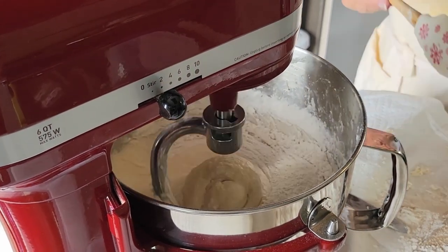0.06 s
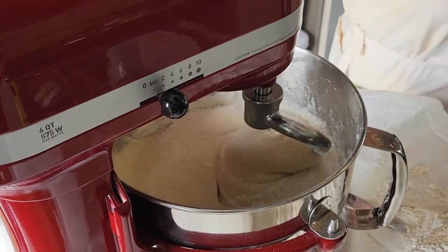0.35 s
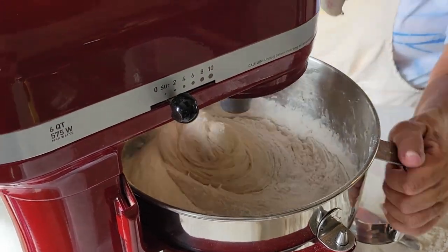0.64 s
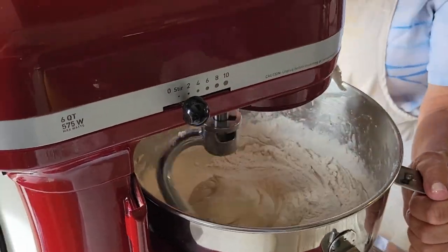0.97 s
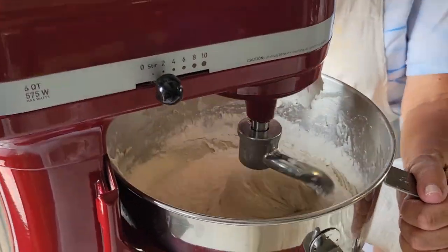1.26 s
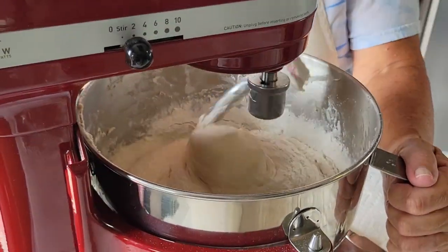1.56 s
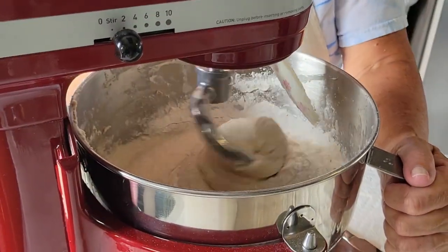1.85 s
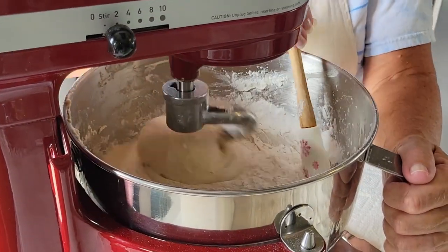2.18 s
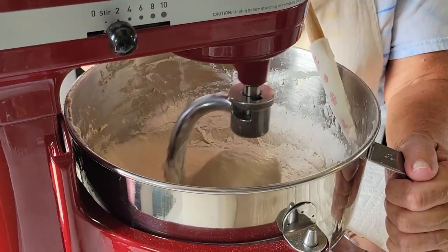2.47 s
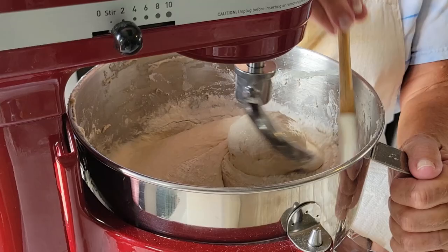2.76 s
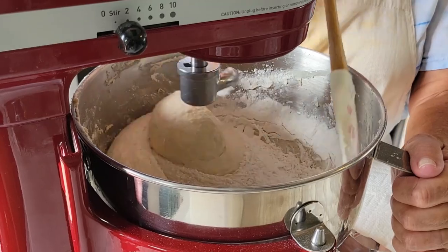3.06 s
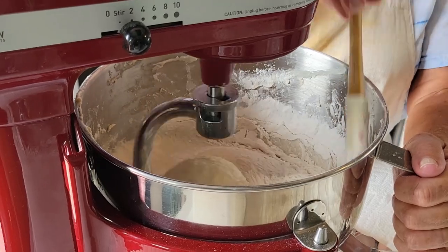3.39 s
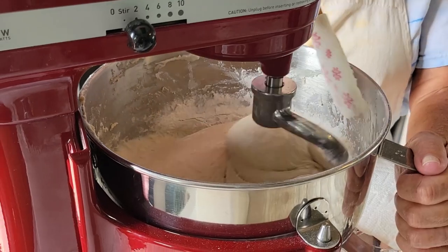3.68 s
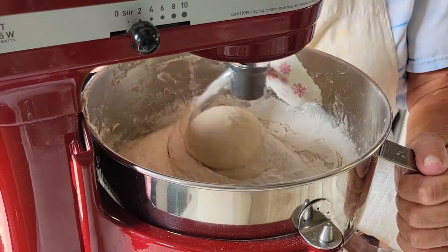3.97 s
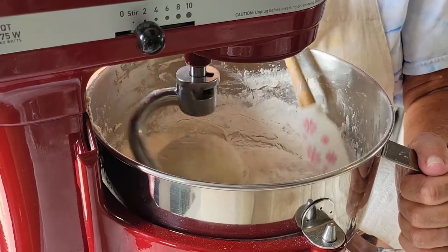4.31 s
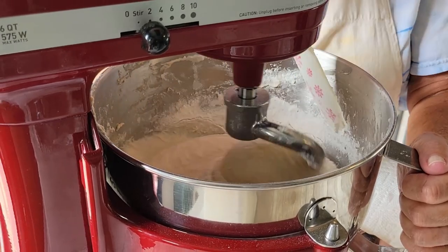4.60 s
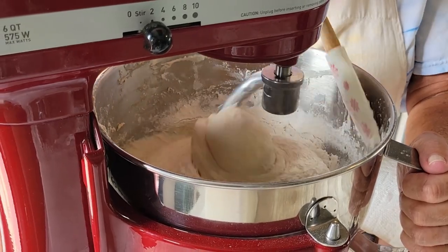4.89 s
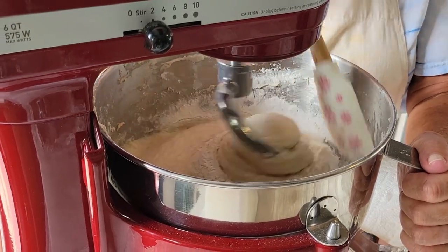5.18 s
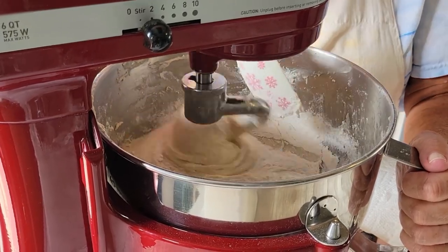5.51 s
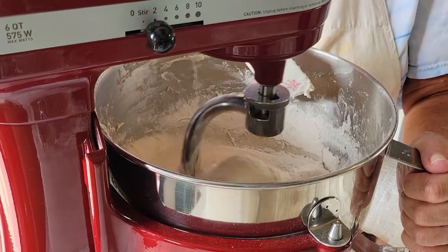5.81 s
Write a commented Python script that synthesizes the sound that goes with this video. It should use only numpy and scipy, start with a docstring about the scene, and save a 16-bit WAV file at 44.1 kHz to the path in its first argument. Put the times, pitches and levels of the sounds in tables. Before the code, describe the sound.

Heard up close in a kitchen, first beside the motor and then above the bowl, an electric stand mixer works dough throughout. The motor hums and hisses while the gears chatter and whine, sagging slightly in pitch with each stroke of the hook. Thin, brief squeaks rise out of the running noise. From about two seconds in, the dough now and then thuds softly against the metal bowl, with a few light ticks.

```python
"""A stand mixer kneads bread dough, heard from beside its motor head and then over the bowl. Its gear whine
sags each time the hook drags through the dough, about three times a second. Knocking teeth ring the bowl, the
brushes hiss, the motor hums and its cooling fan rushes. Brief squeaks swell out of the running noise; now and
then the bowl gives a soft thump or a tick."""
import sys
import numpy as np
from scipy import signal
from scipy.fft import rfft, irfft
from scipy.io import wavfile

SR = 44100
rng = np.random.default_rng(int(sys.argv[2]) if len(sys.argv) > 2 else 0)


def output_pcm(signal):
    """Save a mono or channel-first signal as 16-bit PCM at the path in sys.argv[1].

    Samples are clipped to [-1, 1] before scaling.
    """
    pcm = np.clip(np.atleast_2d(signal).T, -1, 1) * 32767
    wavfile.write(sys.argv[1], SR, np.round(pcm).astype(np.int16))


N = 257984
TIME, FREQS = np.arange(N) / SR, np.fft.rfftfreq(N, 1 / SR)


def amp(db):
    """Decibels to gain."""
    return 10 ** (np.asarray(db) / 20)


def unit(x):
    """Scales to rms 1."""
    return x / np.sqrt(np.mean(abs(x) ** 2) + 1e-20)


def envelope(points):
    """A (time_s, value) curve at every sample."""
    return np.interp(TIME, *np.transpose(points))


def spectrum(points):
    """A (freq_hz, value) curve at every frequency."""
    hz, value = np.transpose(points)
    return np.interp(np.log(FREQS + 1), np.log(hz + 1), value)


def wander(rate_hz):
    """Smooth random modulation of rms 1, rolled off above the given rate."""
    t = TIME[::64]
    hz = np.fft.rfftfreq(len(t), t[1])
    slow = rfft(rng.standard_normal(len(t))) / (1 + (hz / rate_hz) ** 4)
    return np.interp(TIME, t, unit(irfft(slow, len(t))))


def pan(pan_db, lead_rad):
    """Complex stereo gains: positive values make the left side louder and earlier."""
    side = np.array([[.5], [-.5]])
    return amp(side * pan_db) * np.exp(1j * side * lead_rad)


def add(mix, start_s, sound):
    """Mixes a sound in at a time."""
    part = mix[..., round(start_s * SR):][..., :sound.shape[-1]]
    part += sound[..., :part.shape[-1]]


def resonate(x, hz, width_hz):
    """Complex response of a mode with steep skirts; its pitch may move."""
    carrier = np.exp(2j * np.pi * np.cumsum(hz * np.ones(x.shape[-1])) / SR)
    pole = np.exp(-2 * np.pi * width_hz / SR)
    return carrier * signal.lfilter([1], [1, -2 * pole, pole * pole], x * carrier.conj())


# Listening spot: time_s, position (0 beside the motor head, 1 over the bowl)
LISTENER_PATH = [(0, 0.039), (.7, 0.13), (1.05, 0.62), (1.25, 0.7), (1.55, 1), (5.85, 0.88)]

def beside_head():
    """Nearness to the motor head, 0 to 1; scales every beside_db."""
    return 1 - envelope(LISTENER_PATH)


# Hook strokes: free_s, spurt_hz (rise in tooth rate), mesh_db (tooth tone boost in the next drag)
HOOK_STROKES = [(0.181, 13.7, -14), (0.512, 13.45, -5), (0.846, 9.4, -5.5), (1.17, 12, -4.5),
                (1.504, 10, 0.5), (1.855, 16.9, -0.5), (2.183, 14, -0.5), (2.503, 13.4, -0.5),
                (2.837, 15, 0), (3.196, 15.4, 1), (3.524, 14, -3), (3.856, 15, 0), (4.193, 13.77, 0.5),
                (4.523, 15.6, -2.5), (4.871, 12.4, 0), (5.192, 13, -0.5), (5.51, 14.7, -2), (5.85, 8.9, 6)]

def tooth_rate(loaded_hz=513.3, swing_s=.045):
    """Meshing rate in Hz: low while the hook drags, with a spurt each time it slips free."""
    t = TIME[::64]
    spurts = sum(hz * np.exp(-.5 * ((t - free_s) / swing_s) ** 2) for free_s, hz, _ in HOOK_STROKES)
    return loaded_hz + np.interp(TIME, t, spurts)


def mesh_boost(drag_after_s=.13):
    """The tooth tone, in dB, swells with the dough that each stroke catches."""
    free_s, _, mesh_db = np.transpose(HOOK_STROKES)
    return np.interp(TIME, free_s + drag_after_s, mesh_db)


def load():
    """How hard the hook drags: the sag of the speed, mean 0 and rms 1; scales every load_db."""
    tooth_hz = tooth_rate()
    return unit(tooth_hz.mean() - tooth_hz)


TEETH = 30
# Gear partials: shaft_harmonic (rounded when played), level_db, pan_db, lead_rad, load_db
WHINE_PARTIALS = [(26, -43.5, -1, 1.5, 0.5), (28, -52, -1, 0.5, 9), (30, -30.5, -3, 1.22, 1.33),
                  (31, -45, -12, -0.1, -2), (36, -46, -2, 2, 4.5), (39, -55.5, 4, 1.4, 8),
                  (60, -47.5, 1, 1.5, 5.5), (62, -49, -6, 2, -4.5), (70.1, -49, 0, 1, 4),
                  (72.5, -39.5, -0.5, 3.5, -0.5), (83.5, -48, 9, 2, 3.5), (87.2, -39.5, 7, 2.5, -0.5),
                  (89.7, -38, 9, 2.2, -2.5), (92, -38, -3.5, 1.5, 1.5), (121.3, -46.5, 5, 2, 2),
                  (124.4, -49.5, 5, 1.5, 0)]

def gear_whine(turns, shimmer_db=1.4):
    """Meshing teeth sing at multiples of the shaft rate; play in the gears makes each tone flutter."""
    out = np.zeros((2, N))
    backlash = (.3 * wander(12) + .15 * wander(40)) / TEETH
    shaft_rad = 2 * np.pi * turns + backlash
    mesh_db, drag = mesh_boost(), load()
    for harmonic, db, pan_db, lead_rad, load_db in WHINE_PARTIALS:
        harmonic = round(harmonic)
        tone = np.exp(1j * harmonic * shaft_rad + 2j * np.pi * rng.random())
        level_db = db + shimmer_db * wander(14) + load_db * drag + mesh_db * (harmonic == TEETH)
        out += amp(level_db) * unit((pan(pan_db, lead_rad) * tone).real)
    return out


def ring(modes, impacts, bend, diffuse, waver_db, waver_hz):
    """Impacts ring each mode unevenly, its pitch scaled by bend; diffuse widens the stereo image."""
    out, beside, drag = np.zeros((2, N)), beside_head(), load()
    pair = impacts[0] + diffuse * np.array([[1], [-1]]) * impacts[1]
    for hz, width_hz, db, pan_db, lead_rad, beside_db, load_db in modes:
        rung = pan(pan_db, lead_rad) * resonate(pair, hz * bend, width_hz)
        flutter_db = waver_db * wander(waver_hz) / (1 + (width_hz / 300) ** 2)  # wide modes waver less
        out += amp(db + beside_db * beside + load_db * drag + flutter_db) * unit(rung.real)
    return out


# Bowl resonances: pitch_hz, width_hz, level_db, pan_db, lead_rad, beside_db, load_db
BOWL_MODES = [(445.6, 32, -38.5, -5, 0.31, -2, -0.5), (529.7, 17, -42, -4.5, 0.74, -0.5, -3),
              (1019.7, 11.3, -46.5, -16, 0.73, 7, 2), (1780, 106, -42, 3.5, 3.55, -0.5, 1),
              (2046, 20, -43.5, 4, 0.2, -8, 0)]
# Tooth chatter that bends with the speed: same columns
CHATTER_BANDS = [(1295, 58, -38.5, -3.5, 3.17, 6.5, -0.81), (1556, 56, -35, 1.5, 1.62, 2.5, -0.22),
                 (2108, 65, -46.5, 5, 0.22, -5, -1.3), (2476, 75, -38.5, 5, 2.63, -6, -0.37),
                 (2594, 54, -40.5, -15, 1.4, -5.5, 0.037)]

def gear_rattle(turns, throb=.04, wear=.42):
    """Teeth knock as they engage, partly by chance, partly in a pattern that turns with the shaft."""
    flaws = rng.standard_normal(2560)
    repeating = flaws[(turns % 1 * len(flaws)).astype(int)] * np.array([[1], [0]])  # centre only
    force = 1 + throb * np.cos(2 * np.pi * turns)
    knocks, chatter = force * (rng.standard_normal((2, 2, N)) + wear * repeating)
    tooth_hz = tooth_rate()
    bend = tooth_hz / tooth_hz.mean()
    bowl_ring = ring(BOWL_MODES, knocks, bend=1, diffuse=.61, waver_db=1.24, waver_hz=12)
    return bowl_ring + ring(CHATTER_BANDS, chatter, bend, diffuse=.46, waver_db=2.03, waver_hz=10)


def reflect(x, wet, t60_s, patterns=5):
    """Echoes off bowl and counter comb the sound; the pattern drifts as the listener moves."""
    t = TIME[:SR // 20]
    progress = np.sqrt(TIME / TIME[-1]) * (patterns - 1)
    out = x.copy()
    for k in range(patterns):
        arrives = (rng.random((2, len(t))) < .1) & (t > .004)
        taps = rng.standard_normal((2, len(t))) * arrives * amp(-60 * t / t60_s)
        taps /= np.linalg.norm(taps, axis=1, keepdims=True)
        crossfade = np.cos(np.pi / 2 * np.clip(progress - k, -1, 1))
        out += wet * crossfade * signal.oaconvolve(x, taps, axes=1)[:, :N]
    return out / np.sqrt(1 + wet ** 2)


# Tone of the brush hiss: freq_hz, gain_db
HISS_EQ = [(1500, -30.5), (2300, -22.5), (2900, -23.5), (3600, -10.5), (4030, -14.5), (4450, -7.5),
           (5000, -2), (6500, -1), (8000, -3), (9200, -3), (10000, -13), (11400, -17), (13200, -11.5),
           (15700, -27)]
# Stereo spread of the hiss: freq_hz, pan_db
HISS_PAN = [(3000, -17), (5500, 0), (7000, 3), (9000, -1.5), (11000, 7.5), (12300, -1), (14000, 7)]
# Casing resonances: pitch_hz, width_hz, level_db, pan_db, lead_rad, beside_db, load_db
CASING_MODES = [(3211, 186, -42.5, 1.5, 4.5, 3, 0.75), (3696, 75, -42, -7, 0.96, -12, 1),
                (3834, 80, -44, 4, 1.5, 8, -0.39), (4214, 110, -38.5, -3.5, 4.5, 0.5, -0.37),
                (5100, 99, -42, 19, 0.5, -5, -0.22), (5770, 240, -34, -9, 0.4, -3, -0.33),
                (6284, 115, -31, -1.5, 0.8, -8.5, -0.21), (6680, 220, -35, 4, 1, -15, -1),
                (6930, 45, -38.5, -5, 2, -0.5, -0.8), (7020, 35, -35, 2, 1.5, -5, .5),
                (7610, 220, -36, 2, -2, -18, -0.88), (7780, 65, -40, -13, 1, 0, 1),
                (8366, 156, -31, 11, 2, -8.5, -0.63), (8760, 130, -40.5, 10, 3.5, 3, 0.83),
                (9200, 210, -37, 12, 3, -1, 0.9), (9870, 540, -41, 4, 1.5, 1, -0.56),
                (10600, 590, -38.5, 19, 4, -2, -0.44), (13200, 350, -47, 6, 4.5, 9, -0.082)]
# Level ride of the brushes: time_s, gain_db
BRUSH_FADER = [(0, 2.5), (.45, 2), (.8, 2.5), (1.3, 1.95), (2.3, 1.45), (3.3, 2.16), (4.4, 2), (5.85, 2.5)]

def brushes(turns, hiss_db=-24, flicker_db=.44, drift=.0033):
    """Brushes scrape the commutator: a bright hiss that throbs with the shaft and rings the casing."""
    rotor_turns = 6 * turns
    throb = 1 + .019 * np.cos(2 * np.pi * turns) + .033 * np.cos(2 * np.pi * rotor_turns)
    force = throb * amp(flicker_db * wander(30))
    scrape = rfft(force * rng.standard_normal((2, N)))
    hiss = irfft(scrape * amp(spectrum(HISS_EQ)) * pan(spectrum(HISS_PAN), 0), N)
    shade_db = np.outer((-2.8, -.6), beside_head())  # beside the head, the left side is shaded more
    sound = amp(hiss_db + shade_db) * unit(hiss)
    for modes in (CASING_MODES[::2], CASING_MODES[1::2]):  # neighbouring modes ring independently
        impacts = force * rng.standard_normal((2, N))
        bend = 1 + drift * wander(4.1)
        sound += ring(modes, impacts, bend, diffuse=.16, waver_db=1.9, waver_hz=16)
    return reflect(sound, wet=.4, t60_s=.05) * amp(envelope(BRUSH_FADER))


# Mains hum and frame vibration: pitch_hz, level_db
HUM_PARTIALS = [(27, -65), (60, -59), (120, -55), (160, -59.5), (240, -44), (257, -55.5), (360, -58),
                (480, -43.5)]

def motor_hum(waver_db=2.24):
    """The motor frame buzzes at mains harmonics and a few tones of its own, whatever the speed."""
    tones = sum(amp(db + waver_db * wander(3.6)) * np.exp(2j * np.pi * (hz * TIME + rng.random()))
                for hz, db in HUM_PARTIALS)
    return np.sqrt(2) * (pan(pan_db=-1, lead_rad=.41) * tones).real


# Tone of the fan and the churning gears: freq_hz, gain_db
RUSH_EQ = [(15, -28), (40, -10), (65, -6.5), (110, -6.5), (190, -13), (240, -3.5), (300, -4.5), (420, -6.5),
           (600, -2), (900, -1.5), (1350, -4), (1950, -6), (2800, -10.5), (6000, -11)]
# Left-right likeness of the rush: freq_hz, correlation
RUSH_CORRELATION = [(30, .8), (60, .92), (250, .96), (340, .45), (450, .85), (700, .5), (1100, 0)]

def fan_rush(rush_db=-30, swell_db=1.77, beside_db=-.3, load_db=-.2):
    """The cooling fan's low rush: centred in the bass, wide on top, a touch quieter under load."""
    left, stray = rfft(rng.standard_normal((2, N)))
    alike = spectrum(RUSH_CORRELATION)
    right = alike * left + np.sqrt(1 - alike ** 2) * stray
    pair = np.array([left, right]) * pan(pan_db=-.5, lead_rad=0)
    level_db = rush_db + swell_db * wander(14) + load_db * load() + beside_db * beside_head()
    return amp(level_db) * unit(irfft(pair * amp(spectrum(RUSH_EQ)), N))


# Squeaks and rings: middle_s, length_s, level_db, pitch_hz, glide_hz_per_s, width_hz, pan_db
SQUEAK_CUES = [(0.268, 0.32, -26.5, 6400, 5, 75, -11), (0.346, 0.11, -30.5, 1026, 0, 2, -9),
               (0.434, .1, -29.5, 1035, 0, 2, -4), (1.08, 0.74, -32.5, 7600, 0, 170, -7),
               (1.688, 1.1, -41, 10900, 600, 87, 3), (1.12, .4, -36, 5720, -3, 110, 2),
               (2.349, 1.4, -39, 1570, 2, 43, 8), (2.502, .25, -31, 5700, 0, 90, 0),
               (2.65, .3, -33, 6290, 0, 60, 0), (2.87, .7, -38, 442.8, -9, 2, 3),
               (4.35, 1.28, -40, 447.5, 10.5, 1.9, -2), (5.74, 0.51, -36.5, 444.2, 2, 2.7, -3)]

def squeaks():
    """Narrow rings that fade in and out, some gliding."""
    out = np.zeros((2, N))
    for middle_s, length_s, db, hz, glide, width_hz, pan_db in SQUEAK_CUES:
        t = np.arange(-length_s / 2, length_s / 2, 1 / SR)
        pitch_hz = np.pad(hz + glide * t, (SR, 0), "edge")  # a second's pre-roll builds up the ring
        tone = resonate(rng.standard_normal(len(pitch_hz)), pitch_hz, width_hz)[SR:]
        stereo = unit((pan(pan_db, lead_rad=1) * tone).real)
        add(out, middle_s - length_s / 2, amp(db) * stereo * np.hanning(len(t)))
    return out


# Dough hits: start_s, level_db, pitch_hz, t60_s
THUMP_CUES = [(1.745, -39, 62, 0.21), (2.685, -33, 214, 0.12), (3.88, -36, 62, 0.34),
              (4.039, -26, 248, 0.12), (5.069, -23.5, 236, 0.12), (5.089, -35, 60, 0.34)]

def dough_thumps(attack_s=.0011):
    """Soft dough slaps the bowl with short, low thuds."""
    out, t = np.zeros((2, N)), TIME[:SR // 2]
    attack = 1 - np.exp(-t / attack_s)
    for start_s, db, hz, t60_s in THUMP_CUES:
        add(out, start_s, amp(db - 60 * t / t60_s) * attack * np.sin(2 * np.pi * hz * t))
    return out


# Small knocks and ticks: start_s, level_db, pitch_hz, width_hz, t60_s
TICK_CUES = [(2.344, -21, 6600, 3000, .015), (3.011, -14, 6660, 2500, 0.017),
             (4.695, -27, 1000, 200, 0.059)]

def bowl_ticks():
    """Harder touches on the bowl give quickly dying bands of noise."""
    out, t = np.zeros((2, N)), TIME[:SR // 2]
    for start_s, db, hz, width_hz, t60_s in TICK_CUES:
        touch = resonate(rng.standard_normal((2, len(t))), hz, width_hz).real
        add(out, start_s, amp(db - 60 * t / t60_s) * unit(touch))
    return out


def scene():
    """One shaft drives whine, rattle and brushes; the other layers play alongside."""
    tooth_hz = tooth_rate() + 1.1 * wander(3.85)  # lumpy dough makes the speed tremble
    turns = np.cumsum(tooth_hz / TEETH) / SR
    machine = gear_whine(turns) + gear_rattle(turns) + brushes(turns) + motor_hum() + fan_rush()
    return machine + squeaks() + dough_thumps() + bowl_ticks()


def record(dry):
    """A steep high cut takes off the very top."""
    high_cut = signal.firwin(801, cutoff=15760, window=("kaiser", 9), fs=SR)
    return signal.oaconvolve(dry, high_cut[None], "same")


dry = scene()
out = record(dry)
output_pcm(out)
```